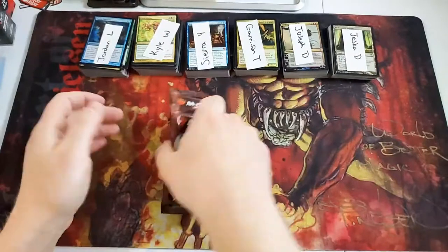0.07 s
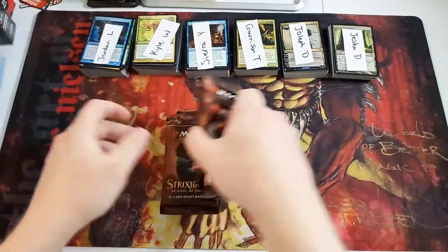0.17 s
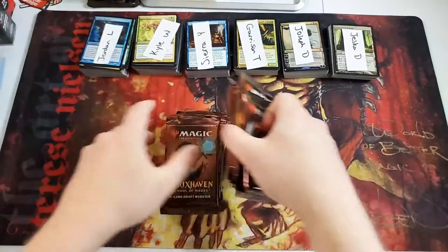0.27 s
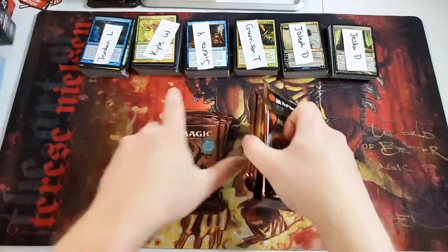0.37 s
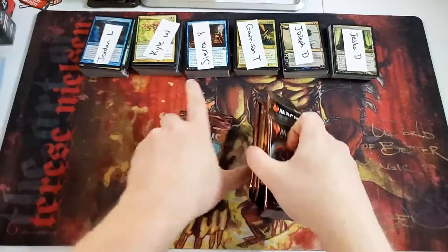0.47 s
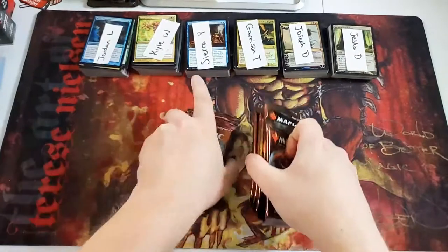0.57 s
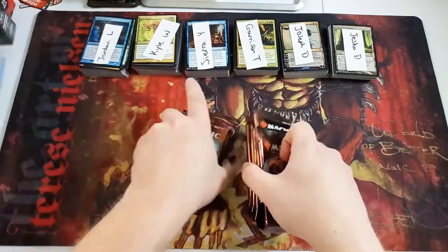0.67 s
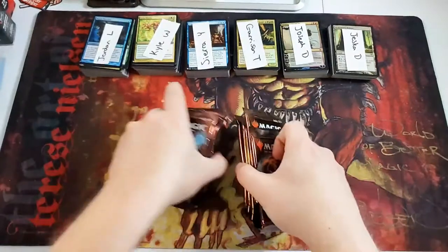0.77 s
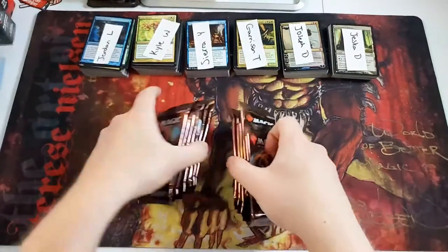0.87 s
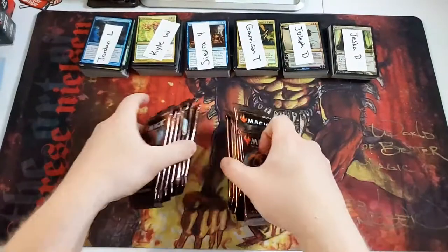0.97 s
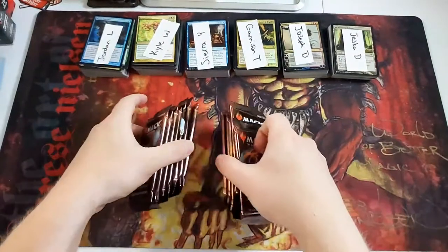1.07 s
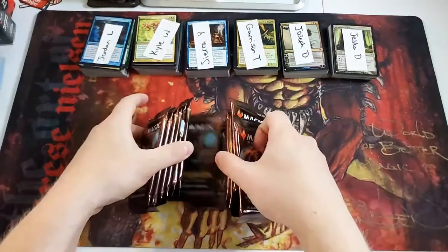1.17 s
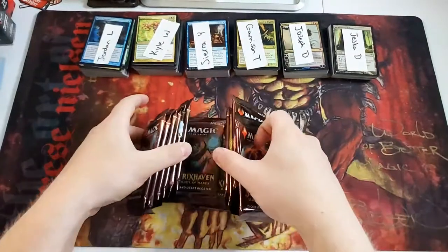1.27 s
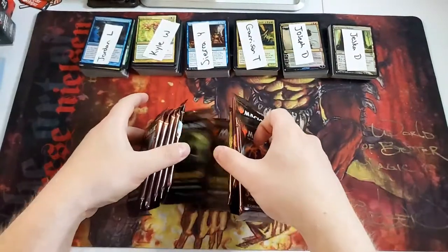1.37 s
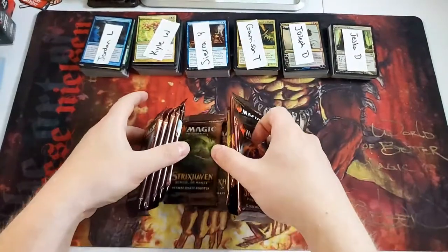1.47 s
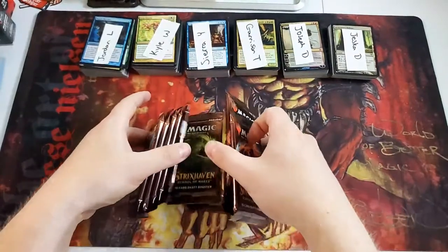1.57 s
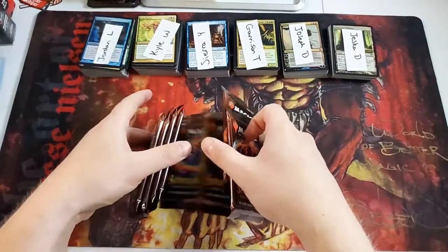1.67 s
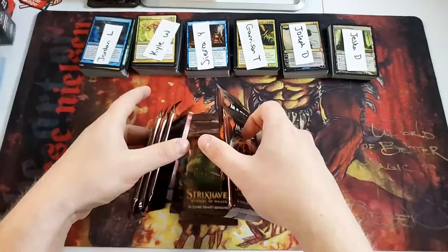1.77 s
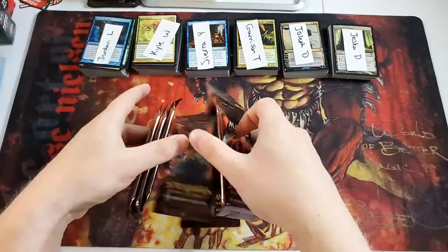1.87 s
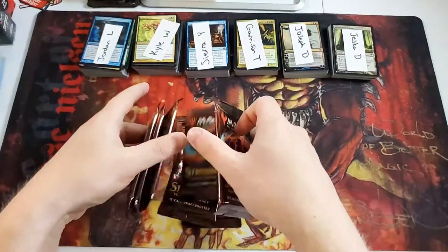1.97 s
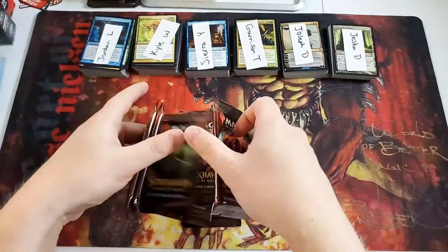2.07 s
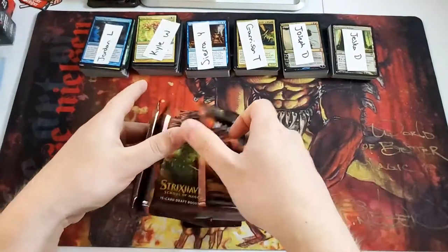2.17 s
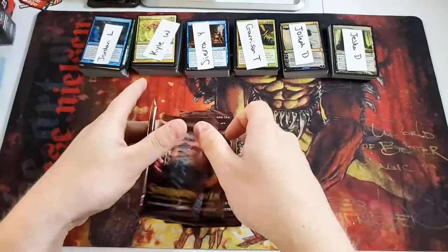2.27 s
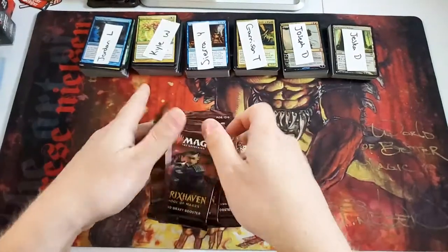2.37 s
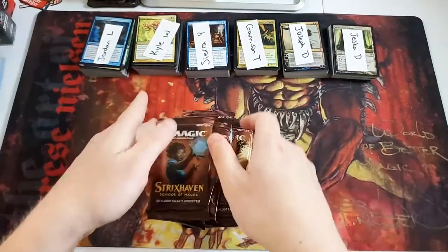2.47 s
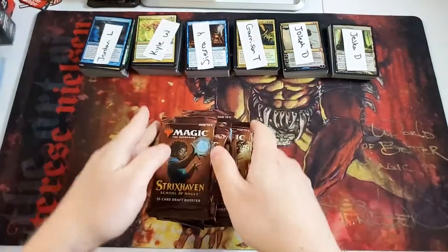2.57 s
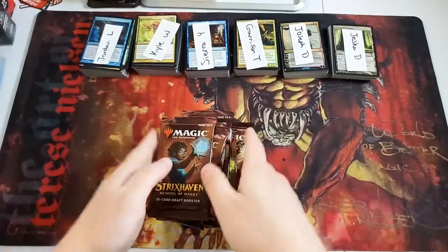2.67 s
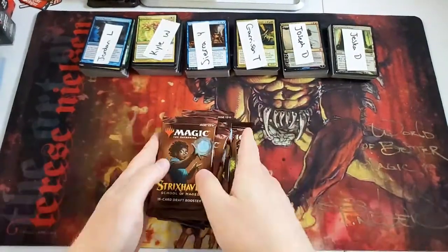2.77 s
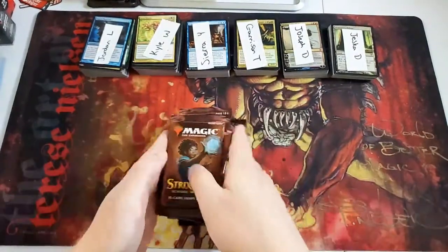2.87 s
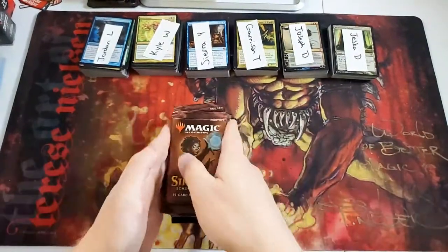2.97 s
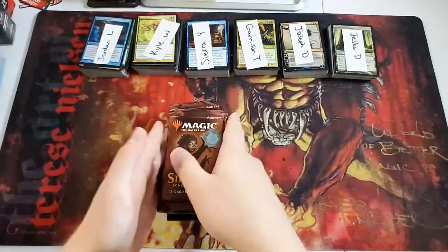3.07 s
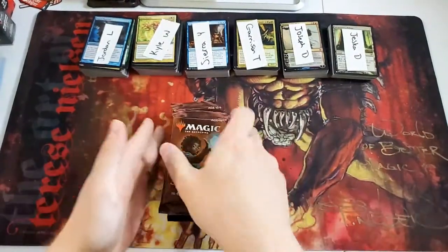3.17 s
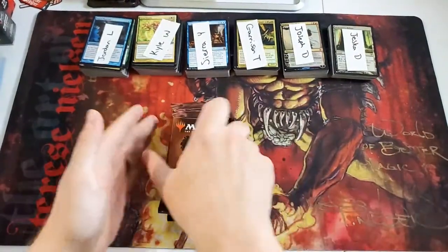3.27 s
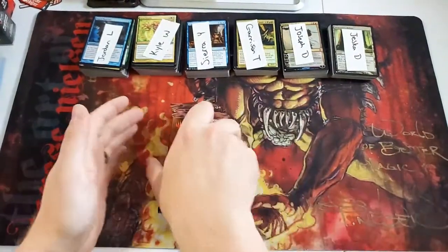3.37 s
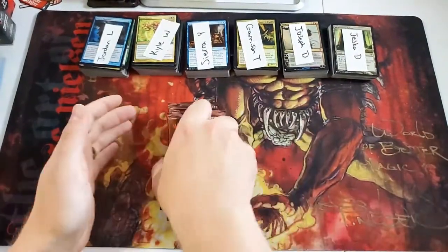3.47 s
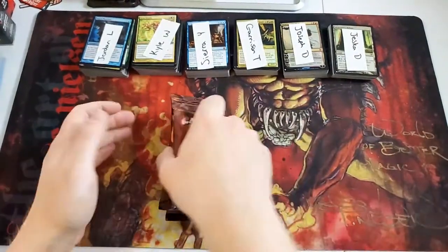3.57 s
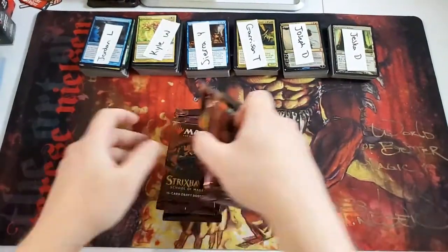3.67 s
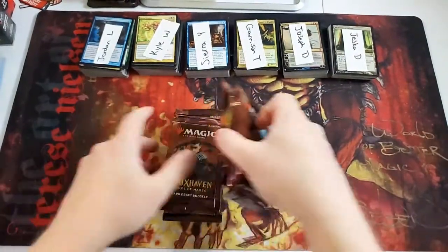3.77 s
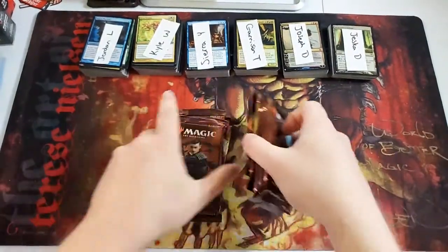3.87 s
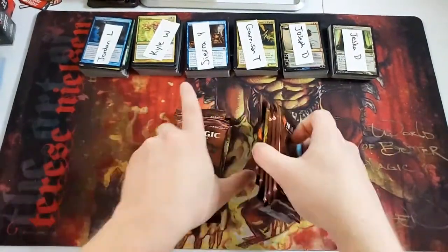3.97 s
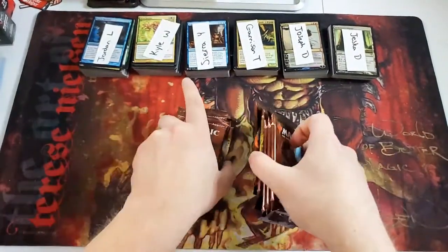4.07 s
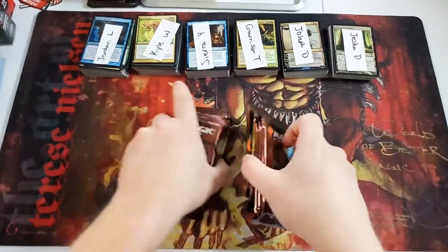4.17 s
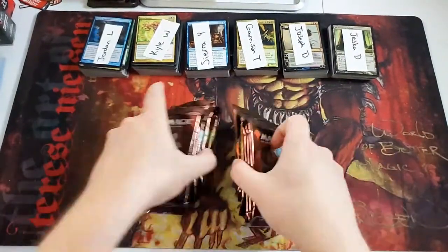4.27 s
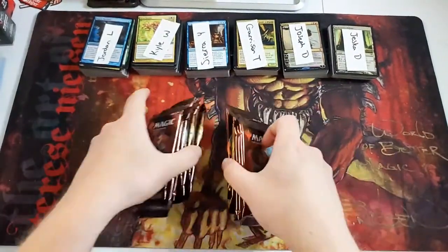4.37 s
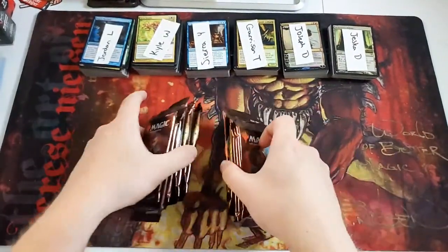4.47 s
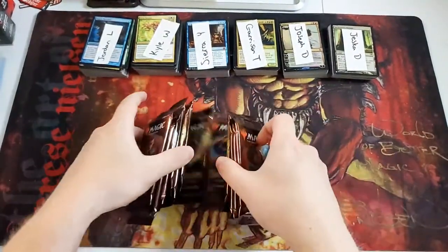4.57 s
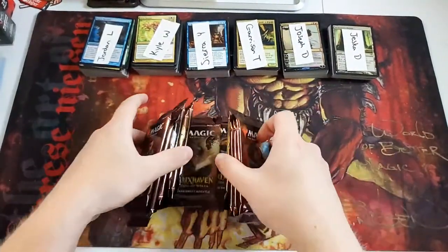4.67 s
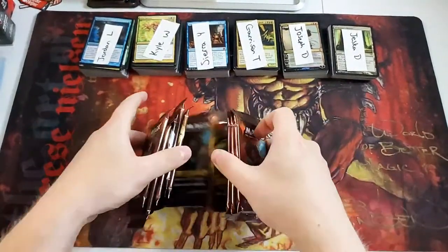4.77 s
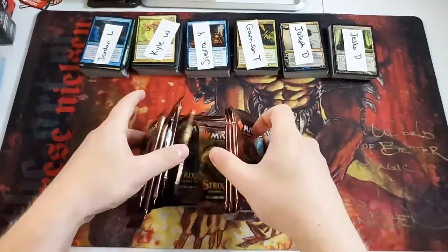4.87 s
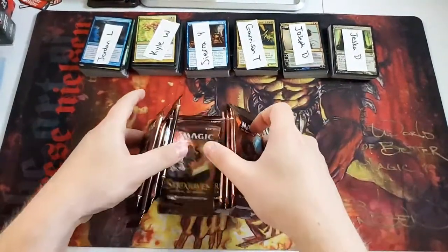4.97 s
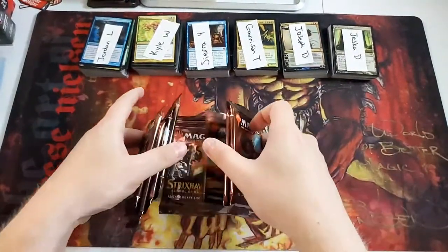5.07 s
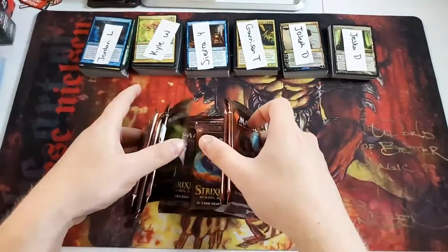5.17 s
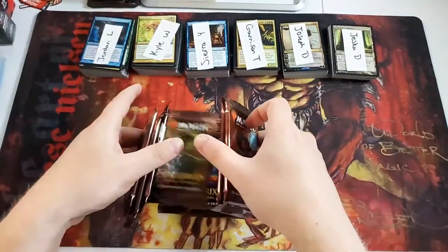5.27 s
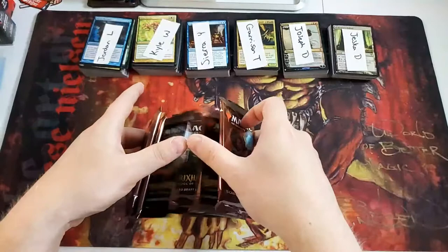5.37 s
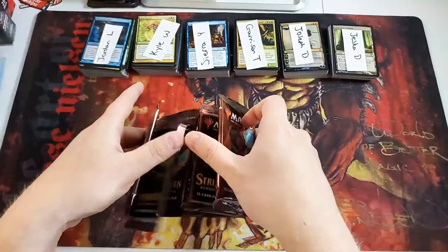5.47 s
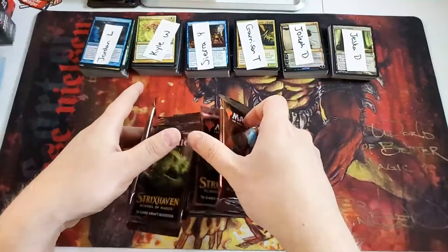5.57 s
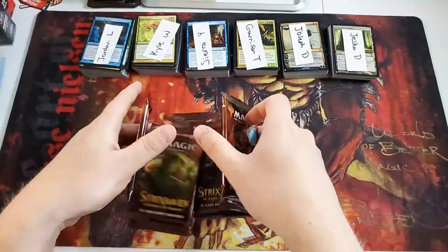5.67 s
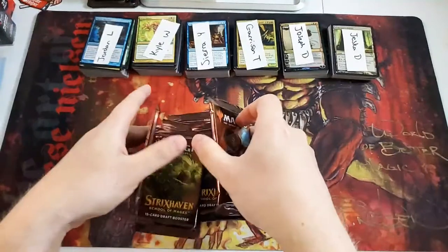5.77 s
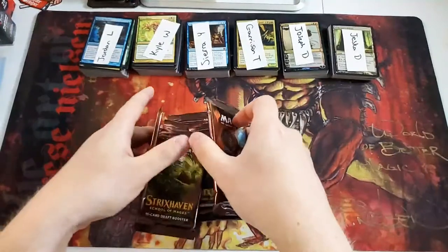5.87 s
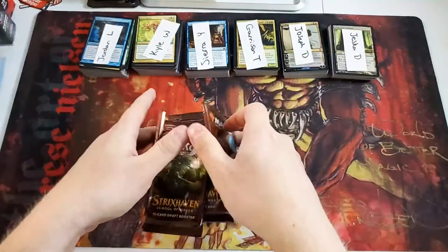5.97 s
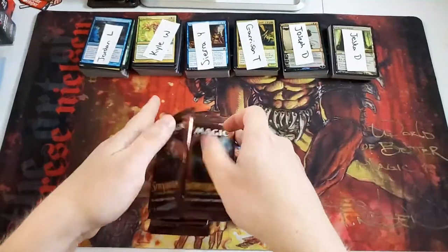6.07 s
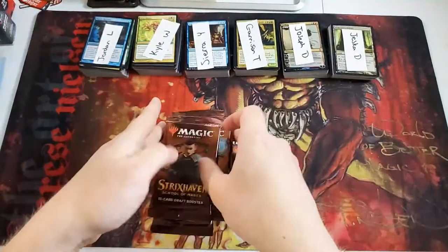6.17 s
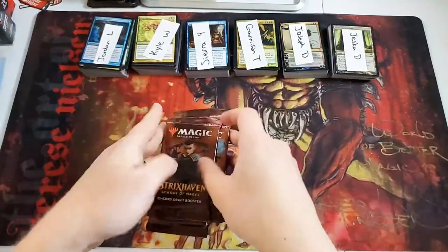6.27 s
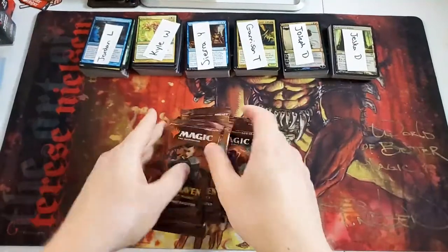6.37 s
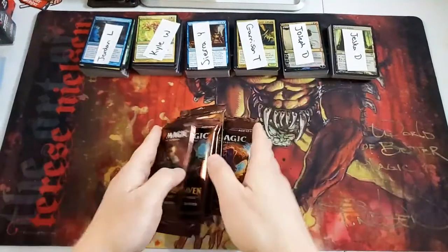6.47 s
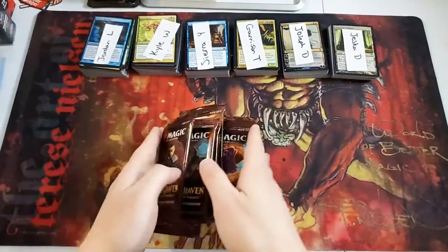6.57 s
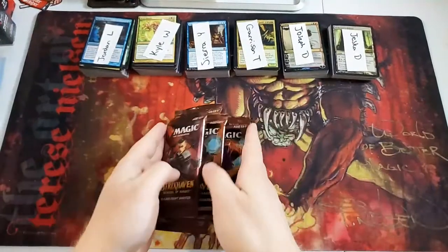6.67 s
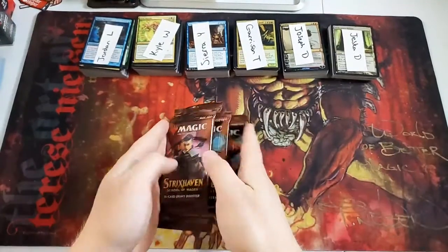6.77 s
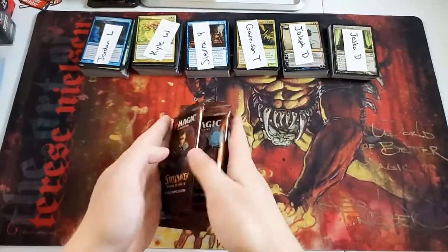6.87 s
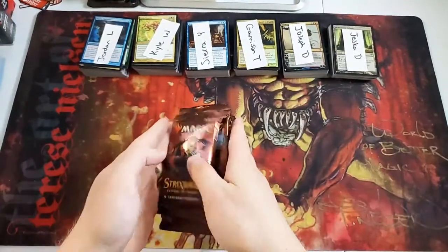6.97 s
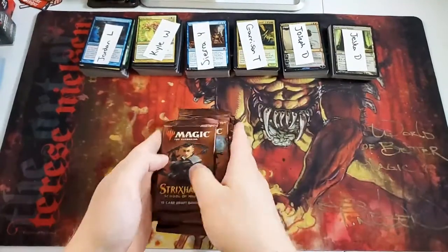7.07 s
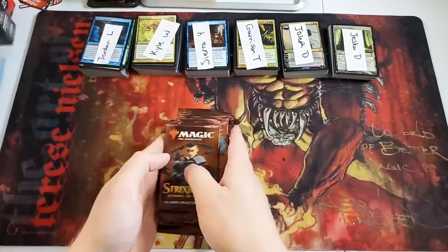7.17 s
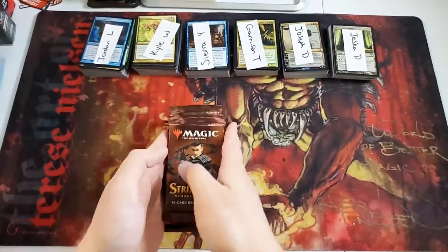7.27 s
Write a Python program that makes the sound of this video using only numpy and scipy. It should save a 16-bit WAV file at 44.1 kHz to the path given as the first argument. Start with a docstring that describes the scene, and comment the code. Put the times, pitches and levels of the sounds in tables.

```python
"""A faint rustle and tick of foil come first, over a low appliance hum in a small room.
Close under a phone microphone, hands riffle two stacks of foil-wrapped card packs together on a
mat-covered table. Wrappers rub as they slide, creases snap, and packs slap down and boom the table top.
Two air pockets pop, something small and hard pings once, and the room rings briefly."""
import sys
import numpy as np
from scipy import signal
from scipy.fft import rfft, irfft, next_fast_len
from scipy.io import wavfile
from scipy.ndimage import uniform_filter1d

SR = 44100
rng = np.random.default_rng(int(sys.argv[2]) if len(sys.argv) > 2 else 0)


def file_out(sig):
    """Save sig as 16-bit WAV at sys.argv[1]."""
    # one column per channel
    cols = np.atleast_2d(sig).T
    # limit, then scale
    lim = np.clip(cols, -1, 1)
    pcm = np.round(lim * 32767).astype(np.int16)
    wavfile.write(sys.argv[1], SR, pcm)


N = 322812


def undb(db):
    return 10 ** (np.asarray(db) / 20)


def colour(x, table, share=1):
    """Filter by (f/Hz, gain/dB) points joined on a log-frequency axis."""
    size = next_fast_len(x.shape[-1])
    hz, db = np.transpose(table)
    gain = undb(share * np.interp(np.log(np.fft.rfftfreq(size, 1 / SR) + 1), np.log(hz + 1), db))
    return irfft(rfft(x, size) * gain, size)[..., :x.shape[-1]]


def band(x, lo_hz, hi_hz):
    """Band-pass that keeps the rms of white noise."""
    sos = signal.butter(3, [lo_hz, hi_hz], "bandpass", fs=SR, output="sos")
    return signal.sosfilt(sos, x) * np.sqrt(SR / 2 / (hi_hz - lo_hz))


def ring(push, modes):
    """Decaying sines excited by a force."""
    out = 0
    for hz, db, t60 in modes:
        pole = np.exp(2j * np.pi * hz / SR - np.log(1000) / (t60 * SR))
        out += undb(db) * signal.lfilter([1], [1, -pole], push + 0j).imag
    return out


def waver(per_s, points):
    """Random values joined by straight lines."""
    return np.interp(np.arange(N) / SR * per_s, np.arange(points), rng.standard_normal(points))


def add(track, s, sound):
    i = int(s * SR)
    track[..., i:i + sound.shape[-1]] += sound[..., :N - i]


# Appliance rumble in the room: f/Hz, relative level/dB
RUMBLE_SPECTRUM = [(18, -36), (30, -18.5), (54, 5), (86, -12.5), (125, -8), (146, -15.5), (311, -27.5),
                   (345, -19), (370, -33.5), (404, -27), (441, -33), (735, -43.5), (2000, -73.5),
                   (2600, -102), (4400, -120)]


def appliance_hum(tone_hz=119.5):
    """Steady low rumble, a wavering tone near twice the mains rate, and faint bright hiss."""
    mid, side = colour(rng.standard_normal((2, N)), RUMBLE_SPECTRUM)
    rumble = (mid + .05 * side * np.array([[1], [-1]])) / np.std(mid)
    phase_drift = np.cumsum(rng.standard_normal(N)) * 0.012
    tone = np.sqrt(2) * np.sin(2 * np.pi * tone_hz * np.arange(N) / SR + phase_drift)
    hiss = colour(rng.standard_normal(N), [(1000, -13.5), (3300, -5), (6000, 4), (15000, 26.5)])
    return undb(-46) * rumble + undb(-52) * tone + undb(-91) * hiss


# Body, middle, bright and airy bands of the foil: low f/Hz, high f/Hz
FOIL_BANDS = [(500, 1800), (1800, 4500), (4500, 8500), (8500, 15800)]
# How well each band radiates friction: gain/dB
FRICTION_GAINS = [1, -3, -3.5, 3]
# Wrappers sliding close under the microphone: start t/s, end t/s, level/dB, extra body/dB
SLIDES = [(0, 0.073, -62, -11.5), (0.134, 0.186, -66.5, -14), (0.316, 0.572, -69, -38),
          (0.57, 0.682, -52.5, -14.5), (0.698, 0.83, -52, -21), (0.982, 1.037, -56.5, -20),
          (1.174, 1.265, -71.5, -3), (1.261, 1.283, -30, 2), (1.468, 1.506, -39.5, 1),
          (1.778, 1.856, -46, 3), (2.07, 2.097, -47.5, 6), (2.353, 2.4, -47.5, 2), (2.856, 2.94, -57.5, -8),
          (2.92, 3.043, -45.5, -6.5), (3.031, 3.195, -58, -11.5), (3.452, 3.603, -67, -23),
          (3.608, 3.708, -68, -20), (4.047, 4.165, -65, -16.5), (4.171, 4.322, -62.5, -12),
          (4.583, 4.668, -62, -10), (4.669, 4.72, -48, 8.5), (4.907, 4.975, -43, -3),
          (5.214, 5.244, -37.5, 1.5), (5.613, 5.627, -42, 3.5), (5.718, 5.745, -46.5, 4),
          (5.767, 5.877, -42, -9), (5.956, 6.035, -49.5, -5.5), (6.111, 6.204, -48, -1),
          (6.174, 6.315, -59, 3), (6.37, 6.553, -59.5, -5), (6.545, 6.67, -63, -1.5),
          (6.63, 6.817, -56.5, -8), (6.821, 6.964, -53.5, -7.5), (6.955, 7.09, -47.5, -9),
          (7.152, 7.231, -60, -3.5), (7.273, 7.336, -60, -3)]


def foil_rustle():
    """Sliding foil: friction noise that starts and stops with the hand, pierced by tiny crackles."""
    gains = np.zeros((4, N))
    for start_s, end_s, db, body_db in SLIDES:
        bands_db = db + body_db * np.array([1, 0.38, 0, 0]) + FRICTION_GAINS
        gains[:, int(start_s * SR):int(end_s * SR)] = undb(bands_db)[:, None]
    gains = uniform_filter1d(gains, int(.02 * SR), axis=1)
    grain = np.exp(-np.arange(300) / SR / 0.0021)
    # some crackles sound in one band only, others in all
    *crackles, shared = [(rng.random(N) < 50 / SR) * undb(3.37 * rng.exponential(size=N))
                         for _ in range(5)]
    grip = undb(2.6 * waver(per_s=30, points=300))
    out = 0
    for gain, own, edges in zip(gains, crackles, FOIL_BANDS):
        envelope = 0.61 * grip + signal.fftconvolve(0.22 * own + 1.39 * shared, grain)[:N]
        out += gain * band(envelope * rng.standard_normal(N), *edges)
    return out


# Resonances of a sealed pack in the hand: f/Hz, width/Hz, level/dB
PACK_RESONANCES = [(1019, 730, 4.5), (2245, 180, 6.5), (3190, 660, 7.5), (5510, 240, 0)]


def pack_resonance(friction):
    """The air and cards sealed in a pack stress a few pitches of the friction."""
    return friction + sum(undb(db) * signal.lfilter(*signal.iirpeak(hz, hz / width, SR), friction)
                          for hz, width, db in PACK_RESONANCES)


# How well each foil band radiates a snap: gain/dB
SNAP_GAINS = [1, 2, 0, 6.5]
# Creases snapping at close range: t/s, level/dB, pitch/octaves above 1 kHz
CREASES = [(0.031, -33, 4), (0.1725, -41.5, 3), (0.4158, -17.5, 5), (0.6299, -36.5, 2),
           (0.8084, -24.5, 1.02), (1.2158, -38, 2), (1.2535, -11.5, 0.4), (1.2659, -11, .1),
           (1.2751, -28, 4), (1.4647, -16, 0), (1.4898, -14, 0.6), (1.73, -36.5, 0.5), (1.7756, -18.5, 3),
           (1.8102, -21.5, 2.7), (1.834, -24, 1), (1.9609, -21.5, 0), (2.0657, -19, 1),
           (2.0825, -18.5, 0.5), (2.1942, -13.5, 0.14), (2.34, -16, .3), (2.3492, -18.5, 0),
           (2.3701, -31, 1.4), (2.382, -23.5, 1.5), (2.407, -10, 4), (2.5162, -26, 0.2),
           (2.5433, -20.5, -0.3), (2.921, -39, -1.5), (2.9439, -46.5, 1), (3.0005, -20.5, 0.4),
           (3.0674, -28.5, 2), (3.1163, -31, 3), (3.1636, -35, 3.5), (3.5066, -39, 2), (3.533, -35, 2.5),
           (3.67, -40, 1), (4.085, -45, 3), (4.1714, -33, 1.78), (4.194, -43, 2.2), (4.244, -32, 1.2),
           (4.2658, -20, 1.56), (4.6399, -23, 2.05), (4.675, -11, 0.76), (4.6899, -15.5, 0.7),
           (4.7207, -25.5, 2.6), (4.9058, -21.5, .8), (4.9441, -15.5, 0.64), (5.0771, -23.5, -0.22),
           (5.2072, -19, 0.06), (5.3573, -20.5, 0), (5.4625, -17, .5), (5.6127, -14.5, 3.8),
           (5.712, -31, 3), (5.73, -26, 2.7), (5.7771, -12.5, -0.26), (5.792, -24, -0.6), (5.8314, -14, 4),
           (6.066, -28.5, 0.5), (6.1244, -17.5, 2.94), (6.1954, -33, 1), (6.2062, -17.5, 0.1),
           (6.2633, -22, 1.6), (6.3058, -21.5, 0.9), (6.4018, -31, .3), (6.4436, -26, 0.2),
           (6.521, -35, 0.3), (6.5953, -38.5, 1.5), (6.611, -41, 1.5), (6.625, -26, 1.9), (6.643, -37, 2),
           (6.834, -28, 2), (6.8725, -23, 2), (6.908, -31, 3), (6.9567, -26.5, 2.5), (7.051, -28, 0.7),
           (7.062, -30.5, 1)]


def crease_snaps(ring_cycles=16):
    """A crease gives way in milliseconds of spiky stick-slip, and the panel beside it rings."""
    t = np.arange(2000) / SR
    forces, panel = np.zeros((4, N)), np.zeros(N)
    centres = np.log2(np.sqrt(np.prod(FOIL_BANDS, axis=1)) / 1000)
    kick = signal.unit_impulse(len(t), idx=25)
    for s, db, pitch in CREASES:
        noise, jitter = rng.standard_normal((4, len(t))), rng.standard_normal(len(t))
        slips = undb(1.7 * jitter + 12.4 * uniform_filter1d(jitter, size=30))
        decay_s = 0.00463 * .8 ** pitch  # small, high creases give way sooner
        burst = slips * np.minimum(t / 0.00078, 1) * np.exp(-(t / decay_s) ** 0.99)
        # bands lose 10 dB per octave below the pitch, 4 above
        loss_db = np.maximum(10 * (pitch - centres), 4 * (centres - pitch))
        add(forces, s, undb(db - loss_db + SNAP_GAINS)[:, None] * burst * noise)
        hz = min(1000 * 2. ** pitch, 15000)
        add(panel, s, ring(kick, [(hz, db - 9.5, ring_cycles / hz)]))
    return undb(-9) * sum(band(force, *edges) for force, edges in zip(forces, FOIL_BANDS)) + panel


# Modes of the table top below the microphone: f/Hz, level/dB, t60/s
TABLE_MODES = [(60.3, -4, 0.18), (93.5, 1, 0.19), (167.7, 0.5, 0.073), (177, -7.5, 0.068),
               (261.5, -11.5, 0.14), (298, -11, 0.14), (327.6, -14.5, 0.15), (393.4, -8.5, 0.11),
               (682.6, -13.5, 0.077)]
# Packs landing on the mat: t/s, level/dB, edge strike/dB relative to that level
LANDINGS = [(1.254, -14, 0), (1.268, -12.5, 0), (1.467, -13.5, -10), (1.779, -25.5, -10),
            (1.819, -22.5, -8), (1.963, -27, -15.5), (2.065, -23.5, -8.5), (2.198, -30, -13.5),
            (2.382, -28, -6.5), (2.543, -37, -8.5), (2.97, -36.5, -2.5), (4.671, -9, -0.5), (4.692, -9, -6),
            (4.911, -12.5, -13.5), (4.947, -13.5, -12.5), (5.085, -21.5, -12.5), (5.214, -20.5, -15.5),
            (5.364, -24, -16), (5.779, -29, -8), (6.261, -39.5, 3), (6.405, -34.5, -10),
            (6.462, -36.5, -11), (6.497, -38.5, -5), (6.567, -46, -5.5), (6.869, -41, -8.5),
            (7.053, -31.5, -16)]


def pack_slaps(push_s=0.00424, edge_s=0.00065):
    """A soft push rings the low table modes, the pack's edge the upper ones; each lands on a new spot."""
    out = 0
    spots_db = 2.72 * rng.standard_normal((len(LANDINGS), len(TABLE_MODES)))
    for mode, mode_spots_db in zip(TABLE_MODES, spots_db.T):
        lowest, upper = mode[0] < 110, mode[0] >= 230
        contact = np.hanning(int((edge_s if upper else push_s) * SR))
        force = np.zeros(N)
        for (s, db, edge_db), spot_db in zip(LANDINGS, mode_spots_db):
            if lowest:  # these grow slowly with the blow and want a flat landing
                db = -37.5 + 0.4546 * (db + 37.5) - 0.32 * edge_db
            elif upper:
                db += edge_db
            add(force, s, undb(db + spot_db) * contact / contact.sum())
        out += ring(force, [mode])
    return out


# Air pockets in a wrapper, popping up at the microphone: t/s, level/dB, f/Hz
AIR_POCKETS = [(2.5436, -13, 1300), (6.2066, -8, 1900)]


def air_pops(bounce_s=0.001265):
    """One pressure pulse between two dips, then its bounce off the table."""
    out = np.zeros(N)
    for s, db, hz in AIR_POCKETS:
        phase = np.pi * hz * (np.arange(80) / SR - 1 / hz)
        pulse = undb(db) * (1 - 2 * phase ** 2) * np.exp(-phase ** 2)
        add(out, s, pulse)
        add(out, s + bounce_s, undb(-4.5) * pulse)
    return out


# Modes of a small, hard object: f/Hz, level/dB, t60/s
PING_MODES = [(3420, 10.5, 0.13), (3483, -2, 0.25)]


def ping(at_s=3.163):
    """One faint tick with a close pair of modes; the ring flutters as the object rocks."""
    tick = undb(-50.5) * signal.unit_impulse(N, idx=int(at_s * SR))
    return ring(tick, PING_MODES) * (1 + waver(per_s=150, points=1200))


# The small room around the table, by band: f/Hz, t60/s, level/dB
ROOM_DECAY = [(320, 0.33, -1.5), (1090, 0.4, -9.5), (3240, 0.4, -7), (7000, 0.41, -11), (14000, 0.28, -7.5)]


def room(x):
    """Diffuse tails; the hands move, so the sound cycles through three unrelated ones."""
    t = np.arange(int(.6 * SR)) / SR
    centres = np.array(ROOM_DECAY)[:, 0]
    edges = [60, *np.sqrt(centres[1:] * centres[:-1]), 18000]
    place = np.arange(N) // 1500 % 3
    out = 0
    for k in range(3):
        tail = 0
        for (_, t60, db), lo, hi in zip(ROOM_DECAY, edges, edges[1:]):
            mid, side = rng.standard_normal((2, len(t)))
            fall = undb(-60 * t / t60) * np.minimum(t / 0.0016, 1)
            sos = signal.butter(2, [lo, hi], "bandpass", fs=SR, output="sos")
            noise = signal.sosfilt(sos, mid + 0.014 * side * np.array([[1], [-1]]))
            tail += undb(db) * noise * fall / np.sqrt(np.sum(fall ** 2))
        share = uniform_filter1d(1. * (place == k), size=200)
        out += signal.fftconvolve((x * share)[None], tail, axes=1)[:, :N]
    return out


def scene():
    """Hands and table close up, with the room and its hum behind."""
    handling = crease_snaps() + .5 * pack_resonance(foil_rustle()) + ping()
    pops, slaps = air_pops(), pack_slaps()
    pan_db = 0.55 * waver(per_s=10, points=80)  # now the left hand, now the right
    direct = (handling + pops) * undb([pan_db, -pan_db]) + slaps
    # pops aim up at the microphone, so the room gets less of them
    return direct + room(handling + .5 * pops + slaps) + appliance_hum()


# The phone's two microphone ports: f/Hz, left minus right level/dB
PORT_BALANCE = [(30, -.9), (70, -.5), (160, -2.8), (300, -1.3), (600, -1), (1200, -.5), (8000, -.4),
                (14000, 0)]
# Response of its microphone: f/Hz, gain/dB
MIC_RESPONSE = [(300, 4), (2000, 1.5), (5000, 2.5), (6900, 10), (7800, 0.5), (9500, -8), (12000, -6),
                (14500, -3), (15600, -8.5)]


def record(dry):
    """The phone just above the table: slightly unequal ports, a peak near 7 kHz, bass and top cut."""
    ports = np.array([colour(dry[0], PORT_BALANCE, .5), colour(dry[1], PORT_BALANCE, -.5)])
    bass_cut = signal.butter(2, 105.5, "highpass", fs=SR, output="sos")
    top_cut = signal.ellip(10, .2, 80, 16000, fs=SR, output="sos")
    return signal.sosfilt(top_cut, signal.sosfilt(bass_cut, colour(ports, MIC_RESPONSE)))


dry = scene()
out = record(dry)
file_out(out)
```